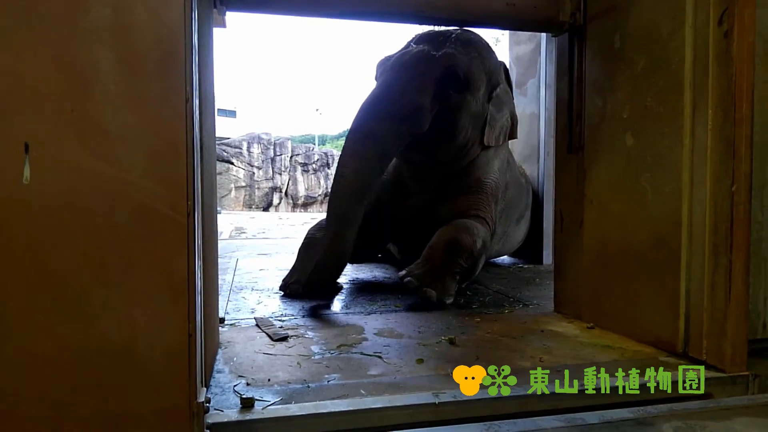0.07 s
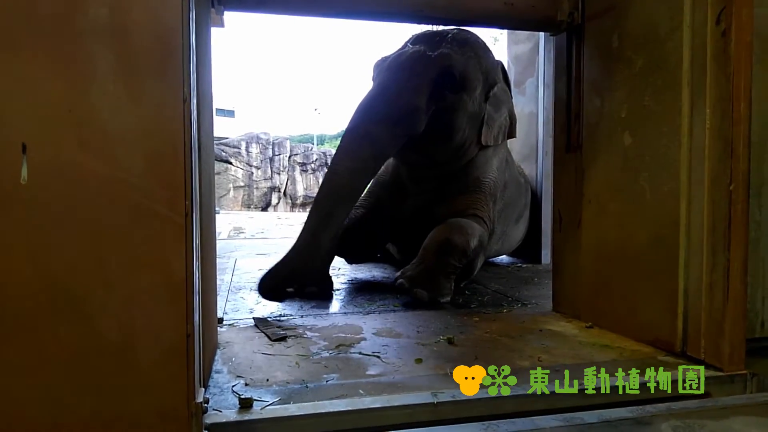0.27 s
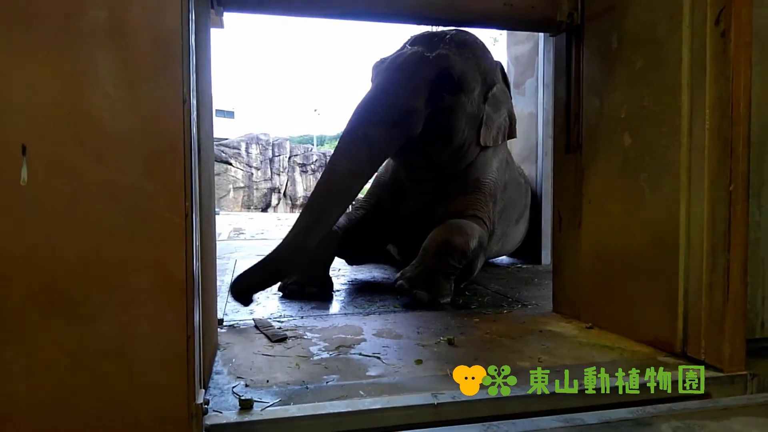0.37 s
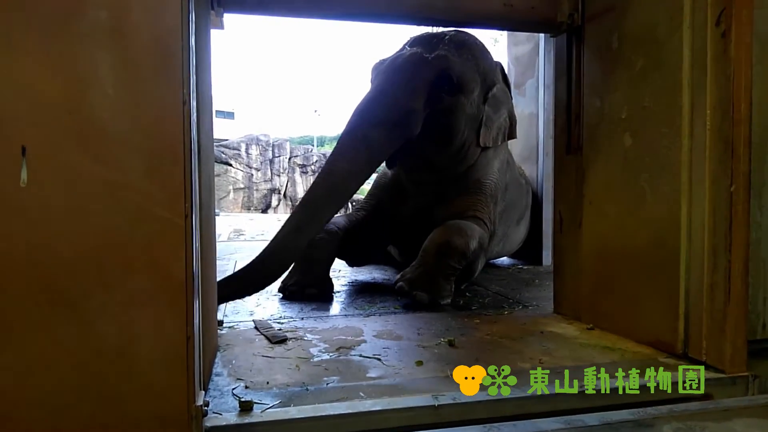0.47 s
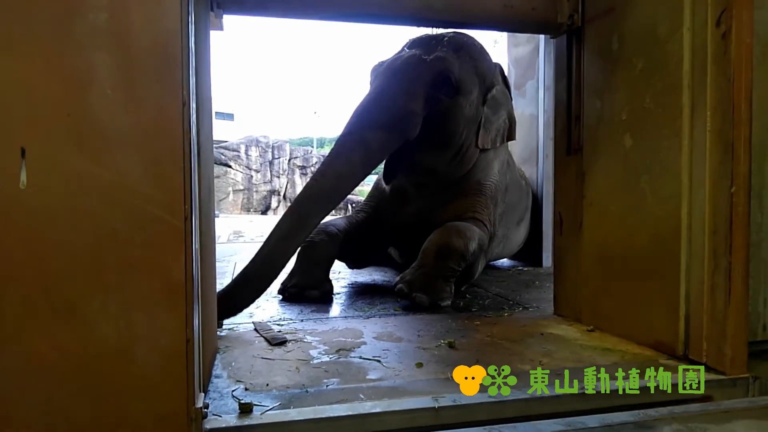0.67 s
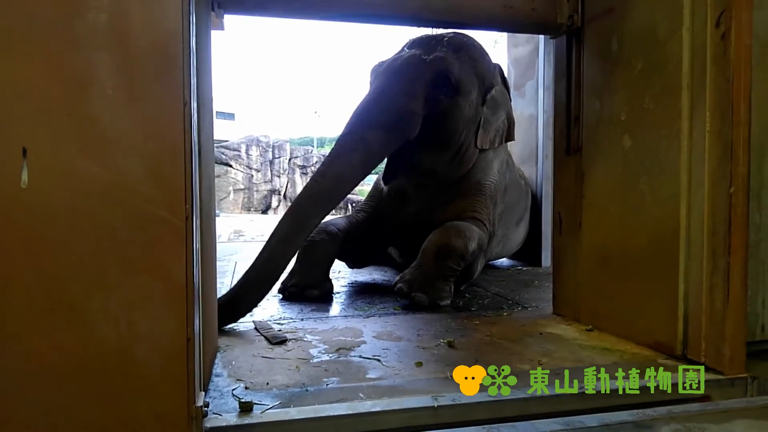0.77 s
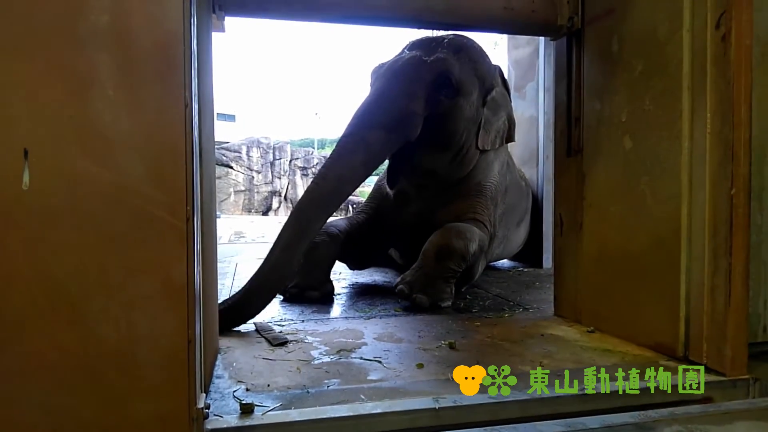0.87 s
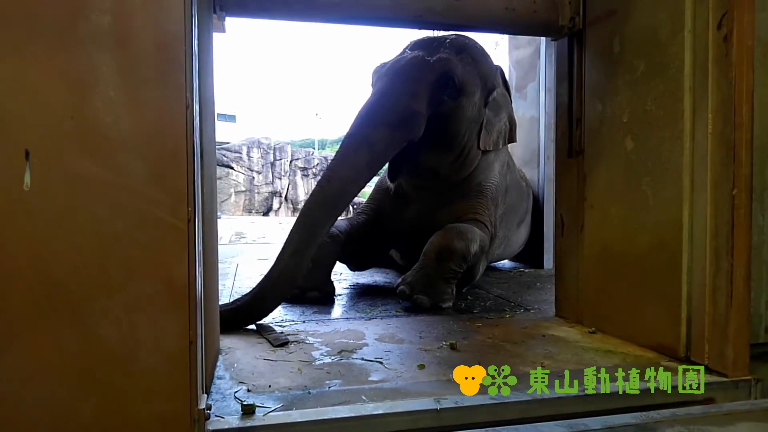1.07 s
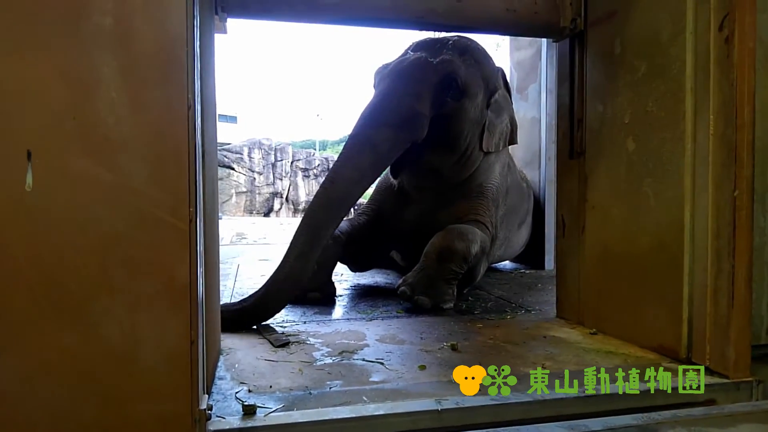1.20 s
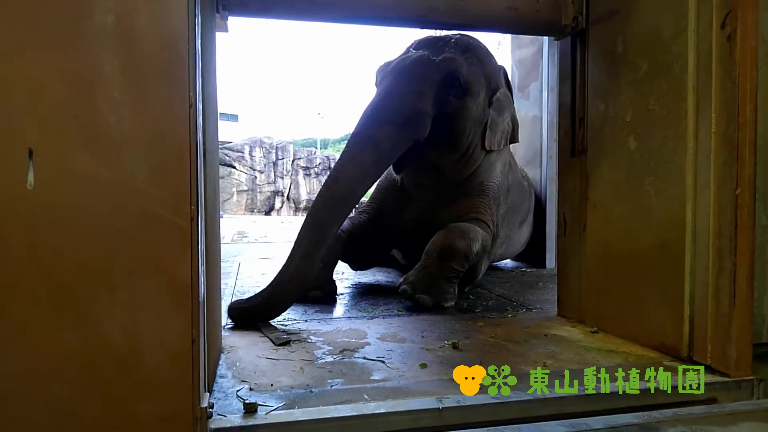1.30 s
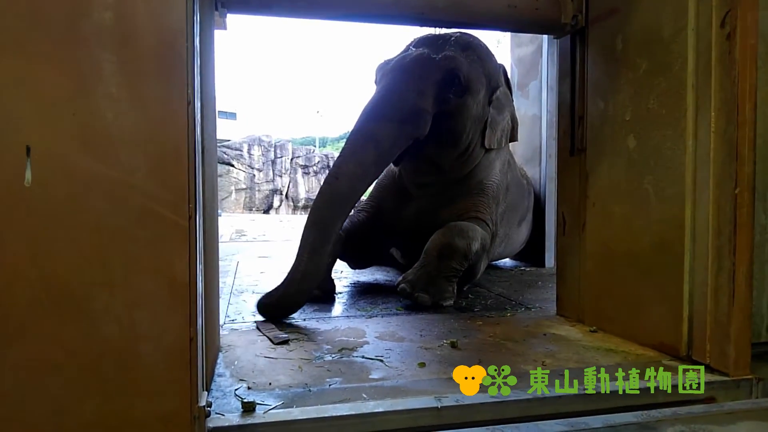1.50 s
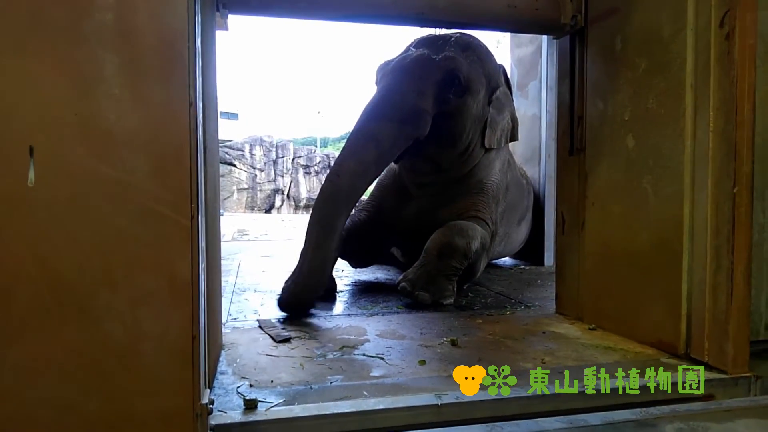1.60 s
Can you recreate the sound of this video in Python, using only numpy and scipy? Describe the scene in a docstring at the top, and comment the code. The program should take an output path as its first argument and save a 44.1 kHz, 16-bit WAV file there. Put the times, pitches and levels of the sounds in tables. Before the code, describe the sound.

A single shrill, hissing puff from an elephant's trunk in a humming, hard-walled hall.

```python
"""An elephant blows once through its trunk in the doorway of a hard-walled house.
Over the hum and rumble of ventilation, air starts to leak and the pinched, wet tip parts with a shrill
sputter. The jet then widens into a hiss that sinks in pitch, with a lower rush from inside the trunk.
The blow rings out in the hall. From about one second a faint second draught follows, and the
ventilation runs on to the end."""
import sys
import numpy as np
from scipy import signal
from scipy.fft import rfft, irfft
from scipy.io import wavfile
from scipy.ndimage import uniform_filter1d

SR = 44100
rng = np.random.default_rng(int(sys.argv[2]) if len(sys.argv) > 2 else 0)


def put_to_file(sound):
    """Save the sound as 16-bit audio at rate SR, in the file named by the first command-line argument."""
    columns = np.atleast_2d(sound).T  # one column per channel
    safe = np.clip(columns, -1, 1)
    whole_steps = np.round(safe * 32767)
    wavfile.write(sys.argv[1], SR, whole_steps.astype(np.int16))


N = 72765
TOP_HZ = 15650


def jet():
    """Turbulent hiss at the trunk tip: the wider the tip opens, the lower the hiss reaches."""
    # Each row: time in seconds, level in dB before the low cut.
    envelope = [(0, -44.5), (.055, -43), (.07, -39), (.13, -37), (.15, -22), (.185, -25), (.21, -24.5),
                (.26, -22.5), (.29, -25), (.32, -30), (.35, -51), (.42, -77)]
    # Each row: time in seconds, corner of the low cut in Hz.
    low_cut = [(0, 8900), (.19, 9100), (.225, 7900), (.26, 6650), (.3, 6540)]
    # Each row: frequency in Hz, relative level of the hiss in dB.
    spectrum = [(3000, 0.5), (6000, -4.5), (7200, -2), (8800, -3), (10200, -1), (11450, -0.5),
                (12000, -5.5), (13500, -16), (15500, -38)]
    cut_db_per_octave, roughness_db = 29, 2
    f, corner_hz = freqs(), curve(low_cut)
    air = rfft(noise(colour(spectrum, f) * (f > 2000) * (f < TOP_HZ)))
    centres = np.geomspace(2000, 16000, 25)
    hiss = 0
    for hz, pick in zip(centres, np.eye(len(centres))):
        band = irfft(air * np.interp(f, centres, pick), N)
        octaves_below = np.maximum(np.log2(corner_hz / hz), 0)
        hiss = hiss + band * undb(-cut_db_per_octave * octaves_below)
    return hiss * undb(curve(envelope) + roughness_db * walk(220))


def sputter():
    """Spurts as the wet tip parts: some only spit, others lock into a wavering whistle."""
    # Each row: peak time in seconds, level in dB, half length in seconds, whistle share from 0 to 1.
    spurts = [(.1405, -26, .003, .05), (0.145, -15.5, .0009, .05), (0.1464, -12, 0.00063, 0.2),
              (.1513, -11.5, .0011, 0.9), (.155, -11, 0.00076, 0.67), (.157, -16.5, .001, .7),
              (0.161, -22.5, .0014, 0.8), (0.167, -24, 0.0012, .1)]
    # Resonances of the slit. Each row: centre in Hz, width in Hz, relative level in dB.
    slit = [(7910, 350, -14.5), (8630, 520, -11), (9300, 450, -3.5), (10400, 450, -1.5), (11040, 280, -7),
            (11500, 500, -9)]
    whistle_hz, waver = 11530, 0.0094
    hiss = unit(sum(undb(db) * noise(resonance(hz, width)) for hz, width, db in slit))
    pitch_hz = whistle_hz * (1 + waver * walk(280))
    whistle = unit(np.sin(2 * np.pi * np.cumsum(pitch_hz) / SR))
    hiss_power = swell(peak_s=0.15, half_s=0.006, db=-25) ** 2  # air leaks between the spurts
    whistle_power = 0
    for peak_s, db, half_s, share in spurts:
        power = swell(peak_s, half_s, db) ** 2
        hiss_power = hiss_power + (1 - share) * power
        whistle_power = whistle_power + share * power
    return np.sqrt(hiss_power) * hiss + np.sqrt(whistle_power) * whistle


def nozzle():
    """Half-whistled resonances of the tip: one slides down as it widens, a lower one speaks briefly."""
    # Each row: time in seconds, centre in Hz, level in dB.
    glide = [(0.169, 9300, -55.5), (.205, 9200, -32.5), (.225, 8300, -39), (.248, 7750, -32),
             (.275, 7070, -30.5), (.297, 6950, -31), (.32, 6940, -47), (.37, 6860, -75.5)]
    width_hz = 210
    centre_hz = curve([(s, hz) for s, hz, _ in glide])
    level_db = curve([(s, db) for s, _, db in glide])
    phase = 2 * np.pi * np.cumsum(centre_hz) / SR
    slide = unit(walk(width_hz) * np.cos(phase) + walk(width_hz) * np.sin(phase))  # narrow noise band
    hollow = noise(resonance(hz=5130, width_hz=250))
    return slide * undb(level_db) + hollow * swell(peak_s=.245, half_s=.016, db=-36)


def bore():
    """The body of the blow: a lower rush of air inside the trunk."""
    # Each row: time in seconds, level in dB.
    envelope = [(0, -50), (.13, -44), (.16, -42.5), (.185, -37), (.225, -36.5), (.25, -38), (.295, -35),
                (.32, -34.5), (.38, -50), (.45, -83)]
    # Each row: frequency in Hz, relative level in dB.
    spectrum = [(500, -14), (1300, -12.5), (2000, -3.5), (2500, -2), (3200, 1), (4200, -2.5), (5200, -1),
                (6500, -5.5), (9000, -13.5)]
    return noise(colour(spectrum, freqs())) * undb(curve(envelope) + 1.24 * walk(110))


def draught():
    """Air moves softly through the trunk as it feels along the floor."""
    # Each row: time in seconds, level in dB.
    envelope = [(.85, -84), (.97, -61), (1.125, -56), (1.16, -51.5), (1.205, -51.5), (1.25, -47),
                (1.335, -49.5), (1.375, -44), (1.46, -49.5), (1.55, -59), (1.65, -55)]
    # Each row: frequency in Hz, relative level in dB.
    spectrum = [(2500, -6.5), (4000, -12.5), (6000, -6), (8000, -2.5), (9800, -0.5), (11500, -4),
                (13000, -8), (15500, -20)]
    return noise(colour(spectrum, freqs())) * undb(curve(envelope) + walk(40))


def hall(send):
    """Hard walls return a diffuse tail that builds up, then dies away sooner in the treble."""
    predelay_s, build_s, low_t60_s, treble_t60_s = 0.012, 0.026, 1.14, 0.64
    t = np.maximum(np.arange(N) / SR - predelay_s, 0)
    wash = rfft(rng.standard_normal(N))
    treble = np.clip((freqs() - 4500) / 6500, 0, 1)
    tail = sum(irfft(wash * band, N) * np.exp(-np.log(1000) * t / t60)
               for band, t60 in [(1 - treble, low_t60_s), (treble, treble_t60_s)])
    tail = tail * (1 - np.exp(-t / build_s))
    return signal.fftconvolve(send, tail / np.sqrt(np.sum(tail ** 2)))[:N]


def near_walls(send):
    """About 20 ms of early reflections, which make left and right differ."""
    echoes = rng.standard_normal(size=900)
    return signal.fftconvolve(send, echoes / np.sqrt(np.sum(echoes ** 2)))[:N]


def ventilation():
    """Room tone: fan noise, ringing ducts and a wavering machine hum."""
    # Each row: frequency in Hz, relative level of the fan noise in dB.
    fan_spectrum = [(59, -39), (100, -2.5), (134, -3), (218, -3), (420, -8.5), (519, -6.5), (640, -8),
                    (712, -2), (758, -12.5), (936, -9), (1310, -13), (1520, -8), (5400, -22.5),
                    (13700, -26.5), (15500, -33)]
    # Each row: centre of a duct resonance in Hz, width in Hz, level in dB.
    ducts = [(463.1, 35, -53.5), (516.3, 25, -58), (702, 36, -69)]
    # Each row: pitch of a machine tone in Hz, level in dB.
    hum = [(59.2, -55.5), (226.1, -60), (452.2, -66), (694.4, -67.5), (947.5, -63), (1136, -63),
           (1491, -61), (1620, -86), (1852, -63), (2546, -64.5)]
    fan_db, waver_hz, flutter = -45, 3.05, 0.24
    f = freqs()
    bed = undb(fan_db) * noise(colour(fan_spectrum, f) * (f > 85) * (f < TOP_HZ))
    for hz, width, db in ducts:
        bed = bed + undb(db) * noise(resonance(hz, width))
    for hz, db in hum:
        phase = 2 * np.pi * (np.cumsum(hz + waver_hz * walk(11.3)) / SR + rng.random())
        bed = bed + undb(db) * unit(np.sin(phase) * (1 + flutter * walk(14.0)))
    return bed


def rumble():
    """The low end of the ventilation swells and ebbs."""
    # Each row: frequency in Hz, relative level in dB.
    spectrum = [(15, -24), (27, 8.5), (40, -21.5), (58, 2), (74, -8), (90, -13.5), (130, -51)]
    # Each row: time in seconds, level in dB.
    envelope = [(0, -38), (.16, -41), (.22, -46), (.34, -41), (.44, -46.5), (.61, -42.5), (.71, -54),
                (.77, -40.5), (.86, -40.5), (.92, -48), (.97, -39.5), (1.14, -51), (1.23, -40), (1.52, -45),
                (1.65, -41.5)]
    f = freqs()
    low = noise(colour(spectrum, f) * (f > 12) * (f < 200))
    levelled = low / np.sqrt(uniform_filter1d(low ** 2, size=SR // 12))
    return levelled * undb(curve(envelope))


def undb(db):
    """Turn decibels into gain."""
    return 10 ** (np.asarray(db) / 20)


def unit(x):
    """Scale to rms 1."""
    return x / np.sqrt(np.mean(x ** 2))


def curve(rows):
    """Join (seconds, value) points by straight lines."""
    return np.interp(np.arange(N) / SR, *np.array(rows, float).T)


def swell(peak_s, half_s, db):
    """A bell-shaped rise and fall; half_s is its standard deviation."""
    return undb(db) * np.exp(-.5 * ((np.arange(N) / SR - peak_s) / half_s) ** 2)


def freqs():
    """The frequency of each spectrum bin in Hz."""
    return np.arange(N // 2 + 1) * SR / N


def colour(points, hz):
    """Gain of an EQ curve of (Hz, dB) points at the given frequencies."""
    f, db = np.array(points, float).T
    return undb(np.interp(np.log(hz + 1), np.log(f), db))


def resonance(hz, width_hz):
    """Gain of a resonant peak, width_hz wide at 6 dB down."""
    return 1 / (1 + ((freqs() - hz) / width_hz * 2) ** 2)


def noise(gain):
    """Noise of rms 1, shaped by a gain at each frequency."""
    return unit(irfft(gain * np.exp(2j * np.pi * rng.random(N // 2 + 1)), N))


def walk(rate_hz):
    """A smooth random wobble of rms 1 that rolls off around rate_hz."""
    return noise(np.exp(-(freqs() / rate_hz) ** 2) * (freqs() > 0) + 1e-12)


def scene():
    """The trunk and its reverb over the room tone of the house, nearly all in the centre."""
    blow_send_db, sputter_send_db = -6.5, -10.5
    trunk_side_db, house_side_db, left_trim_db = -26, -43, -0.43
    blow = jet() + nozzle() + bore() + draught()
    spurts = sputter()
    trunk = blow + spurts + hall(undb(blow_send_db) * blow + undb(sputter_send_db) * spurts)
    house = ventilation() + rumble()
    mid = trunk + house
    side = near_walls(undb(trunk_side_db) * trunk + undb(house_side_db) * house)
    return np.array([(mid + side) * undb(left_trim_db), mid - side])


def record(dry):
    """A steep low-pass takes off the very top."""
    return signal.sosfilt(signal.ellip(10, .1, 90, TOP_HZ, fs=SR, output="sos"), dry)


dry = scene()
out = record(dry)
put_to_file(out)
```